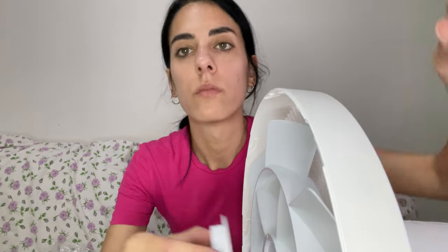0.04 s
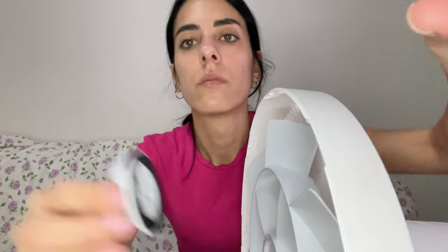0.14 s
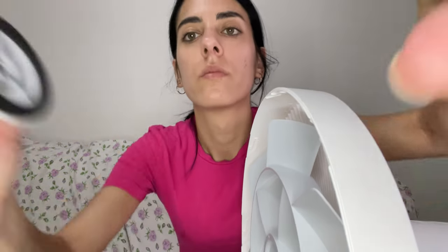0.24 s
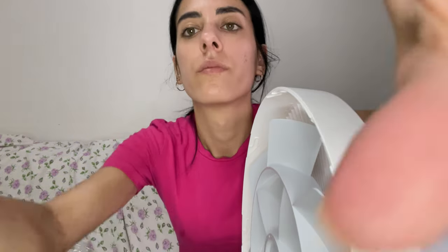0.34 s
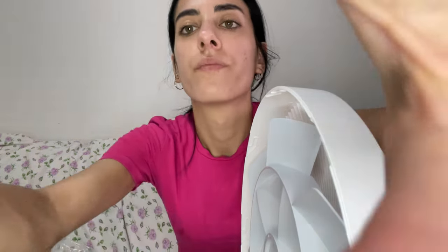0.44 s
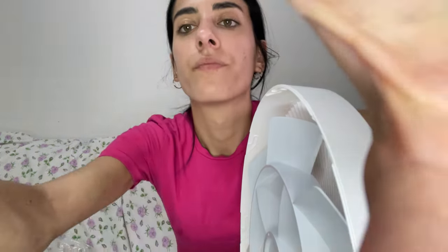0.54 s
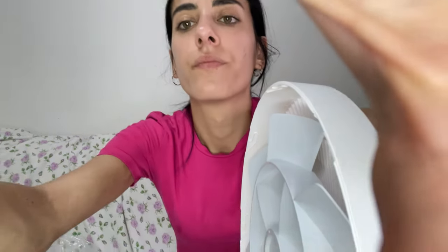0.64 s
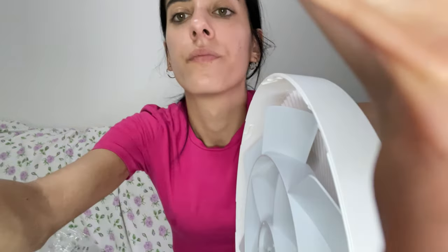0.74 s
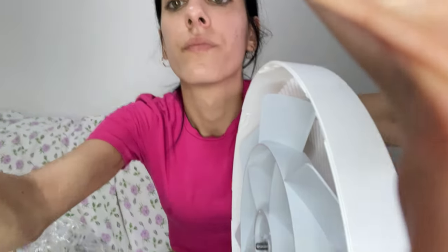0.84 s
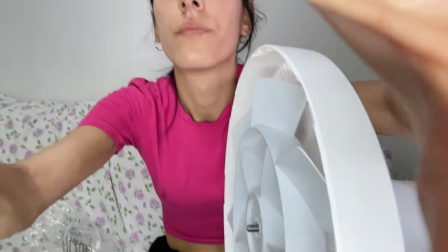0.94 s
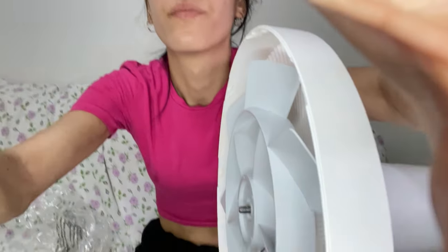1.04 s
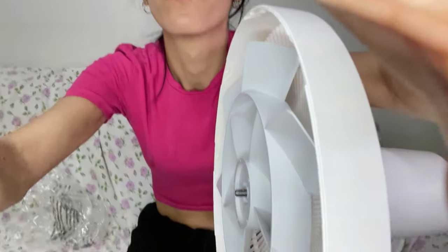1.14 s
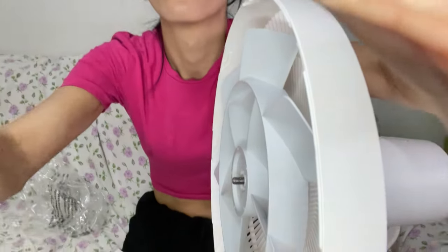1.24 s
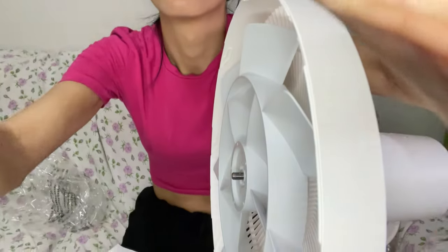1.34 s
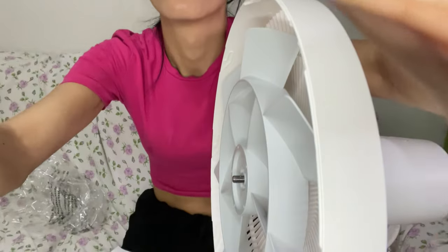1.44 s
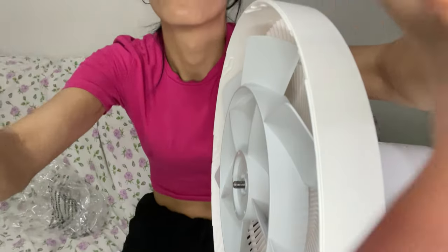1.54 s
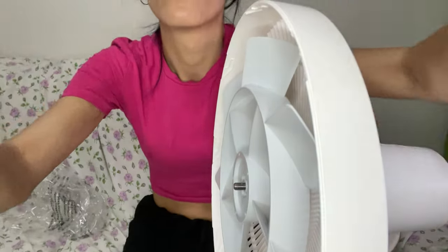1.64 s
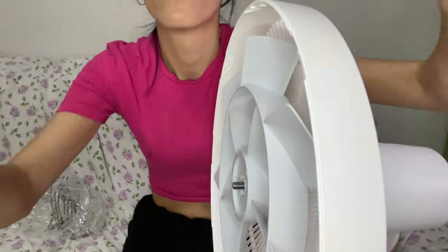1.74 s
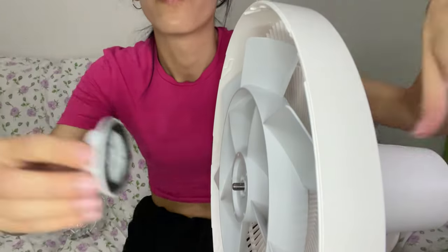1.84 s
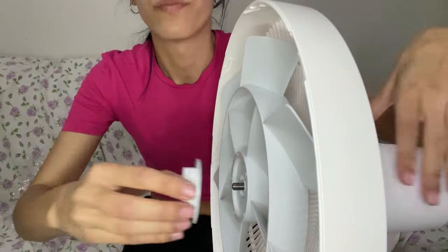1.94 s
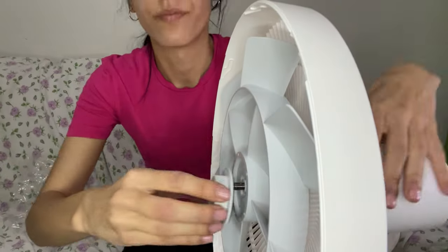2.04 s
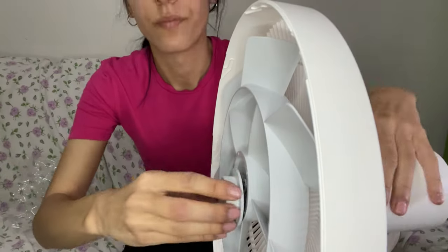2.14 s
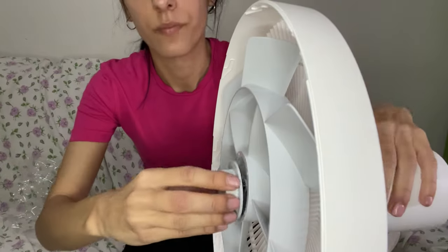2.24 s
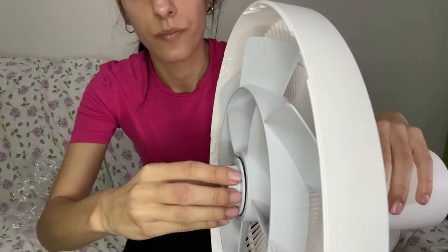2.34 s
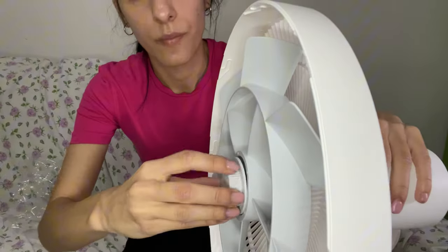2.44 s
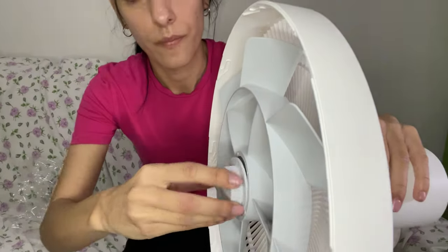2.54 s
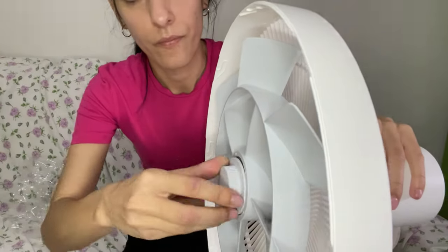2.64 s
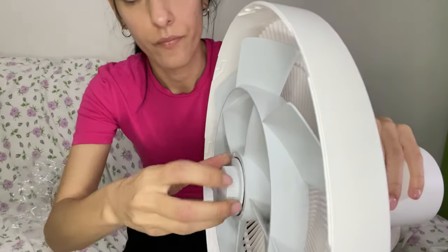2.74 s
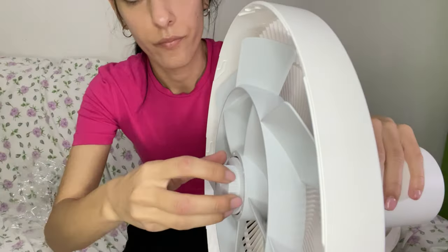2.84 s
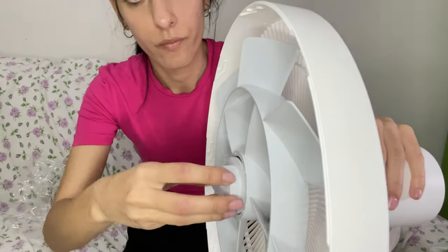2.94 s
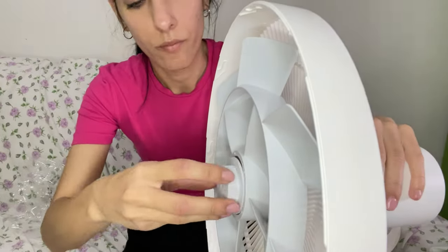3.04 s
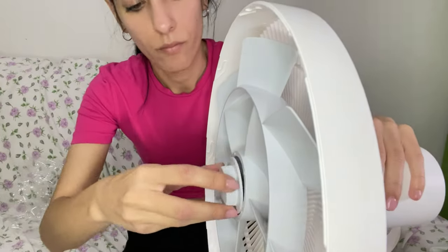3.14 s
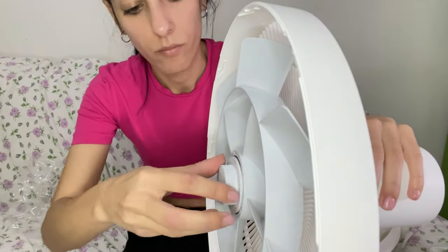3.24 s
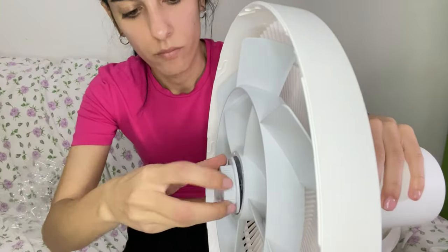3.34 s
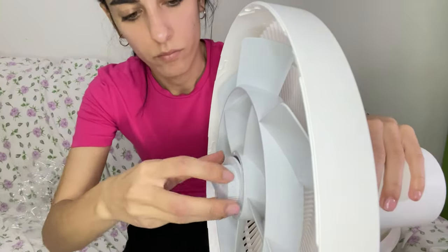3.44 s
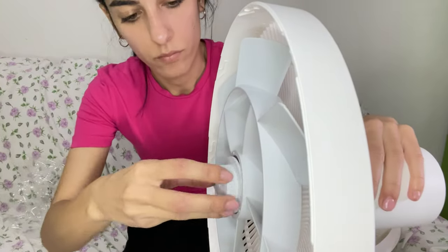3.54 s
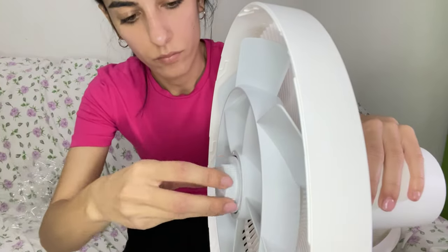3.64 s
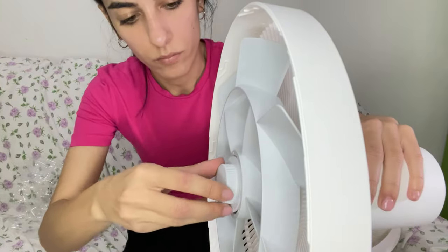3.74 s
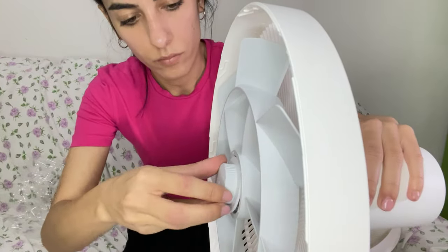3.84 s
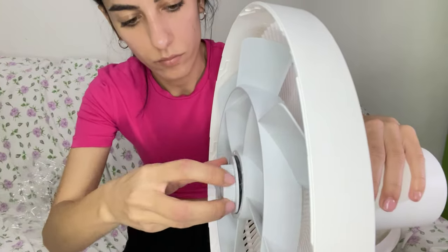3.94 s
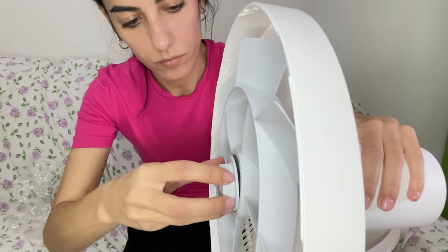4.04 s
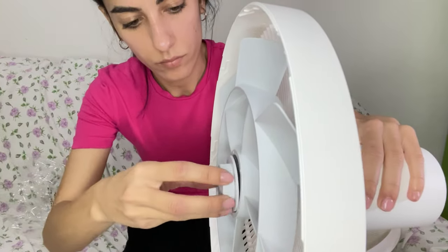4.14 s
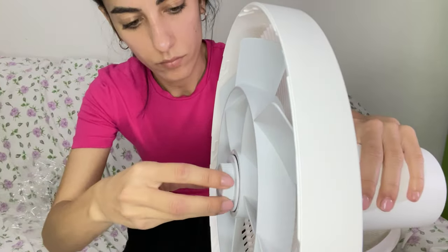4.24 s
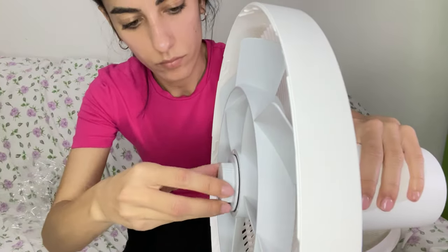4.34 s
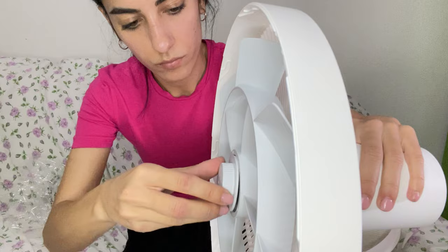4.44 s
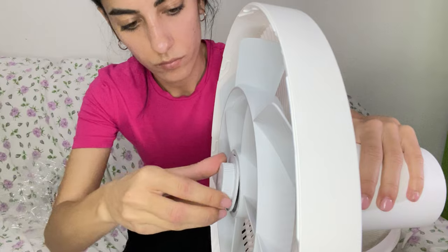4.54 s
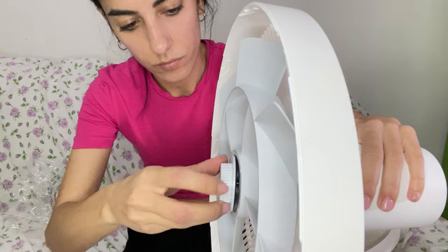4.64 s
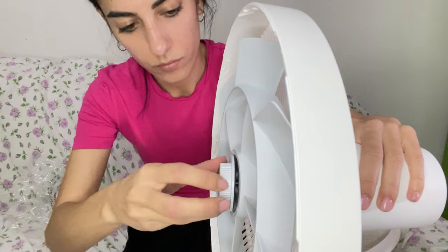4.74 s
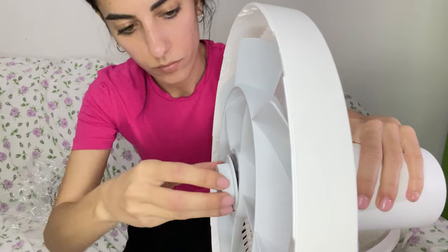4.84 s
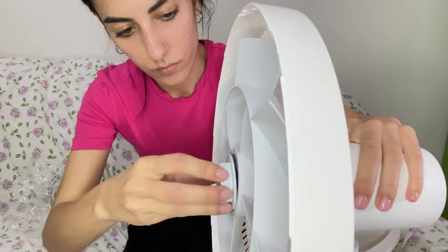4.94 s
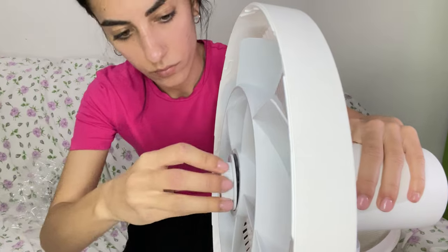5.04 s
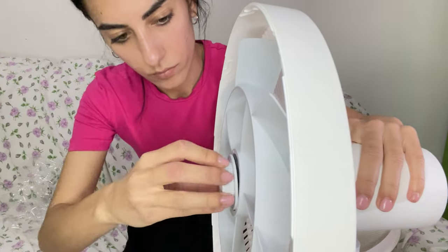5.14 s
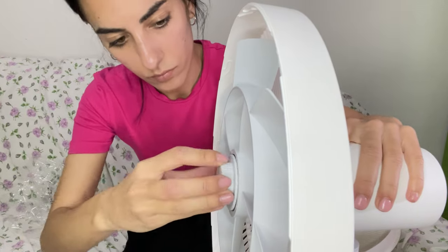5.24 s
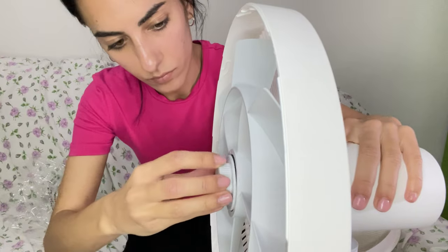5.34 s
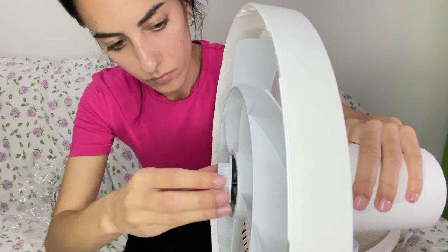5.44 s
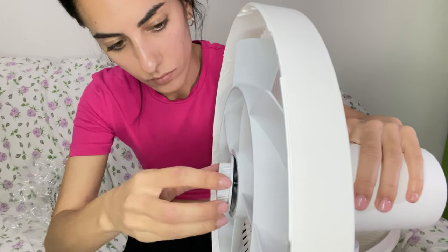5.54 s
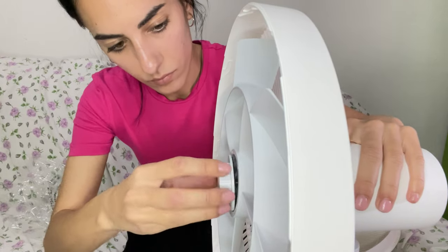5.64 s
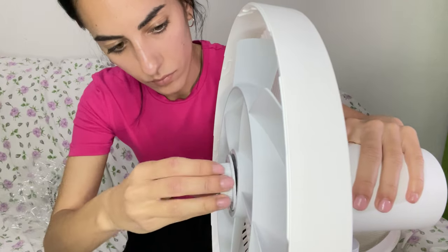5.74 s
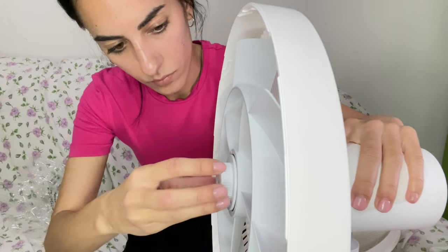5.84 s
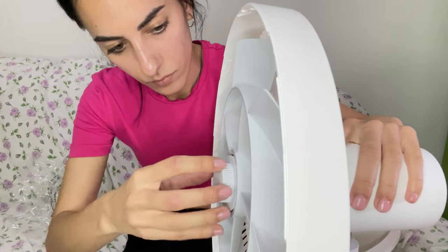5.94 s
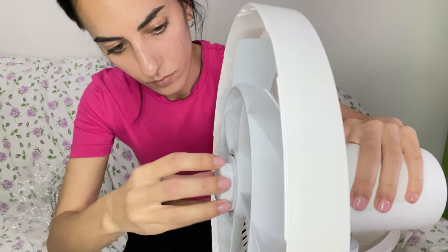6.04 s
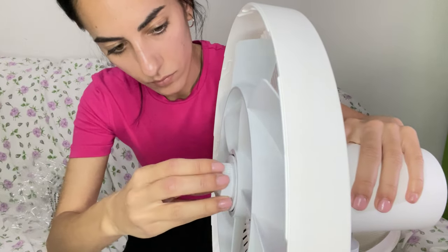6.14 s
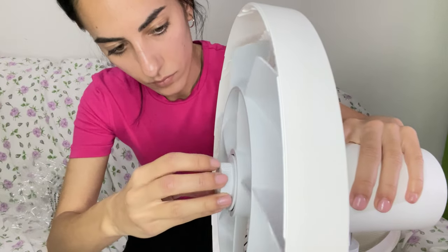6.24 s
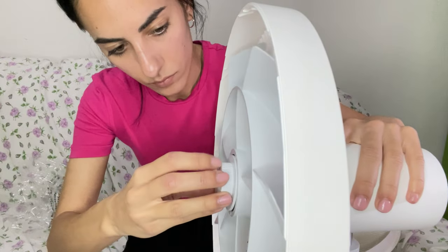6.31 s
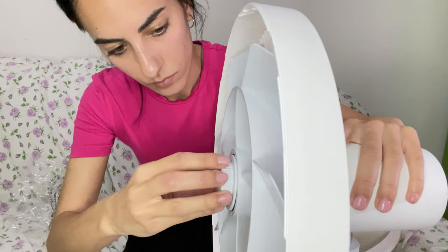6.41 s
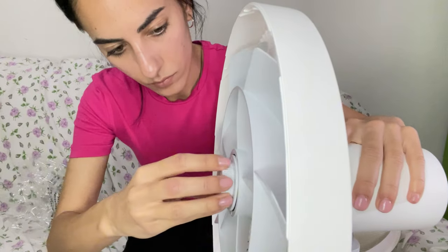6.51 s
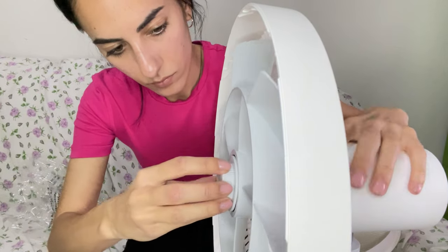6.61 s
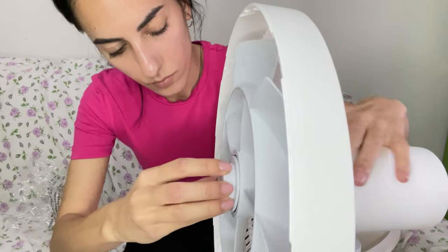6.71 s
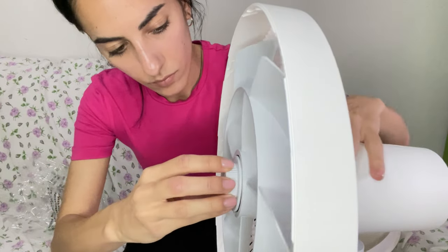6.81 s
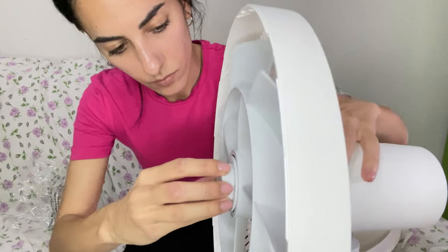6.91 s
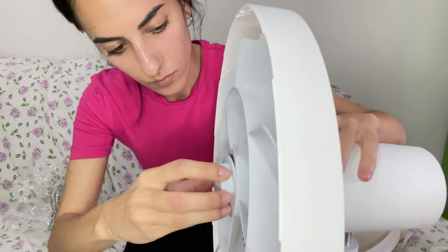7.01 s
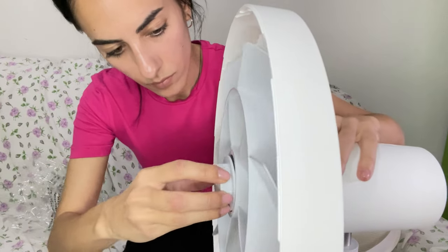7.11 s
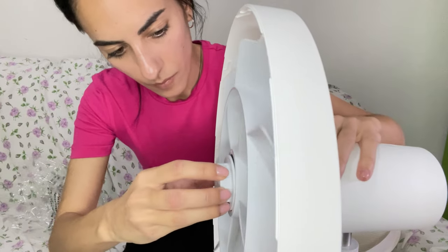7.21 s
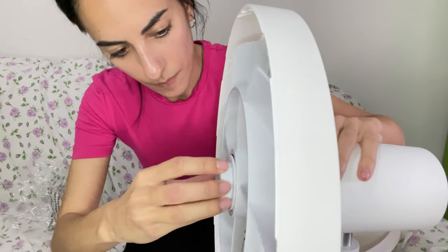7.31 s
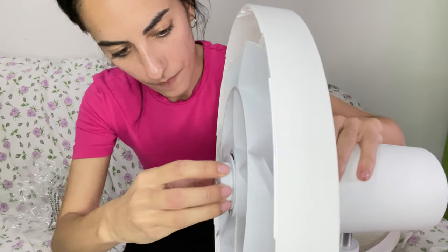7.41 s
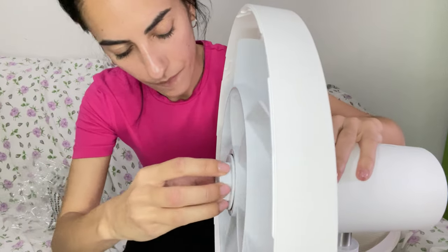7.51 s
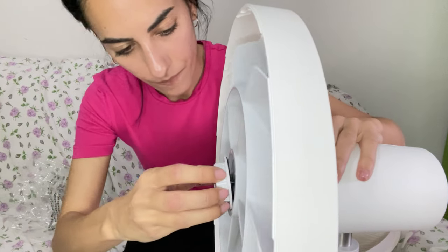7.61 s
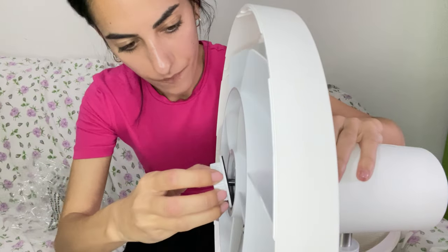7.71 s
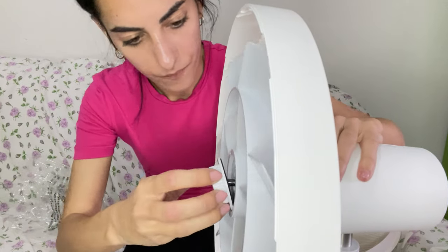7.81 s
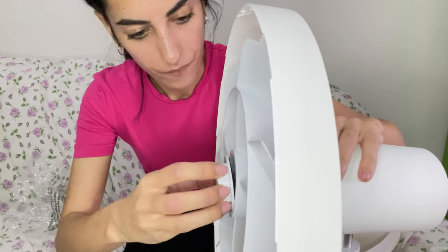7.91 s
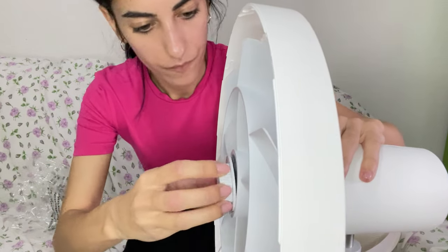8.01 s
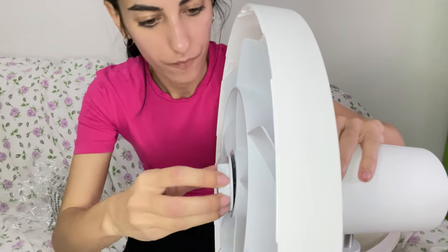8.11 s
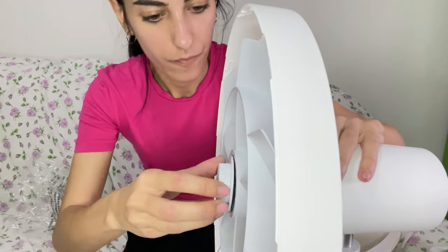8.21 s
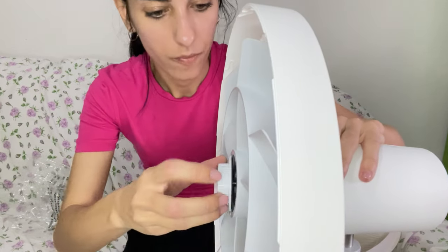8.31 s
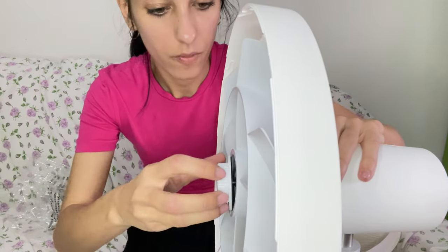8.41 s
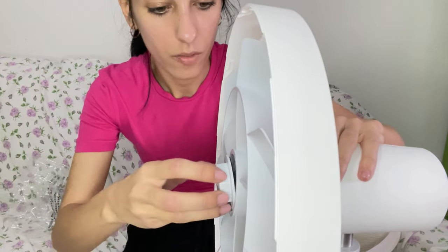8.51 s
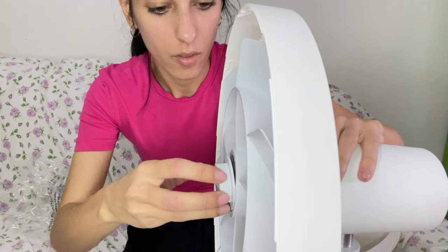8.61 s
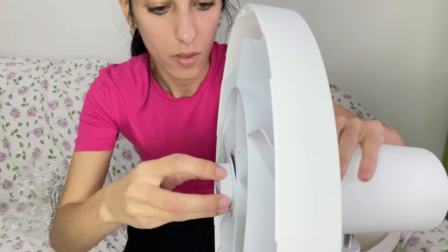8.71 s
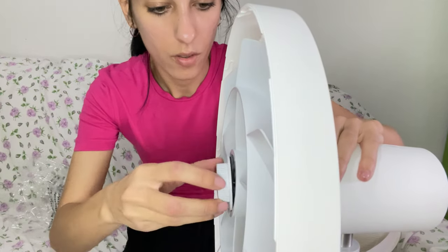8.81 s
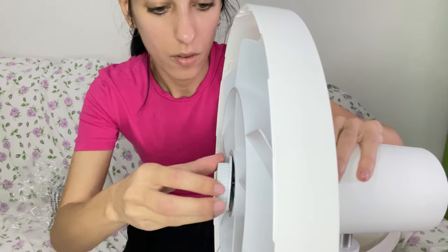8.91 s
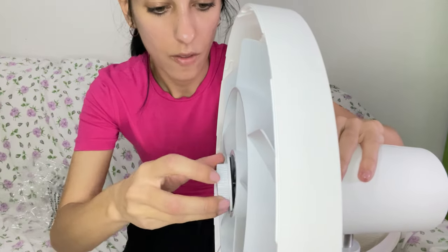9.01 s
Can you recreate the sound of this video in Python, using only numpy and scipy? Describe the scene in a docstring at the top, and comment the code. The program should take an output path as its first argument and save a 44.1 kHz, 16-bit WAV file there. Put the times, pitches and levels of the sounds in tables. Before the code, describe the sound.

Dry, bright plastic clicks with a short hollow ring, made by hand-turning a cap on a stationary fan hub. Quiet handling taps and far birds lead in; then irregular knocks, with a strong clack near three seconds, short gritty rubs and soft finger hiss. A gentler middle gives way to firmer knocks. Close stereo microphone, small room reflections, faint hum, hiss and rumble underneath.

```python
"""A hand works a plastic cap onto the shaft of a desk fan: each knock is a few clicks into decaying modes
of rotor, housing and steel shaft plus a noise crack; scrapes drive the same modes with tiny random slips.
Fingertips add soft hiss and, at first, tap a phone: noise bursts over a low ringing push.
A small soft bedroom answers with discrete echoes and a diffuse noise tail.
Far birds (blurred falling tones), low rumble, a faint hum and a hiss lie underneath."""
import sys
import numpy as np
from scipy import signal
from scipy.fft import rfft, irfft
from scipy.io import wavfile

SR = 44100
rng = np.random.default_rng(int(sys.argv[2]) if len(sys.argv) > 2 else 0)


def persist_wave(psi):
    """Save psi, clipped to +-1, as 16-bit WAV."""
    counts = np.round(np.clip(psi, -1, 1) * 32767).astype(np.int16)
    wavfile.write(sys.argv[1], SR, np.atleast_2d(counts).T)


N = 399546   # length in samples

# knocks of the cap on the hub: start_s, level_db, then the reach of the blow against the hub:
# depth_db (housing), heft_db (rotor), edge_db (bright parts)
CAP_KNOCKS = [(2.1137, -33, -4, -3, -10.5), (2.27, -30, -12.5, -1.5, -19), (2.3232, -24, -36, -4, -10.5),
              (2.333, -18, -20.5, -16.5, -12.5), (2.3534, -17.5, -34, -10.5, -10.5),
              (2.561, -32.5, -32, -4.5, -25), (2.5785, -24.5, -32, -10, -16), (2.645, -52, -42, 4, 12),
              (2.6675, -26.5, -25, -2, -10), (2.6943, -22, -20.5, -10, -49),
              (2.7424, -34.5, -13, -13, -38.5), (2.7538, -52.5, -19, -12, 9.5), (2.816, -38, -9, -0.5, -42),
              (3.0858, -11.5, -26, -14, -17), (3.2158, -27.5, -25, -9, -24), (3.265, -34.5, -24, -7, -10),
              (3.3154, -24.5, -26.5, -24, -12), (3.4325, -28.5, -28.5, -10, -21),
              (3.4959, -24, -29.5, -5.5, -21), (3.6027, -43.5, -29, 0.5, -31),
              (3.6528, -43.5, -33, -9, -17), (3.6784, -29.5, -41, -6, -37),
              (3.713, -34.5, -26.5, -6.5, -27), (3.775, -41.5, -38, -16, -27), (3.8466, -37, -28, -11, -12),
              (3.8745, -25, -31, -3.5, -16), (3.8849, -13.5, -35.5, -17, -17.5),
              (4.0168, -39, -37, -4, -29), (4.1918, -37, -34, -3.5, -21), (4.2615, -47.5, -20, -3, -32),
              (4.502, -49.5, -16, -2.5, -32), (4.5665, -45, -17, -6, -26), (4.582, -32, -38, -4, -17),
              (4.6737, -27, -50, -21, -25), (4.7926, -40.5, -9.5, -3, -4.5), (4.9192, -48.5, -23, -8, -28),
              (4.9528, -21, -22.5, -11, -20.5), (5.143, -30, -32, -21, -40), (5.208, -50.5, -12, -4, 6),
              (5.2421, -34.5, -23, -5.5, -23), (5.3233, -36, -23, -9, -39), (5.373, -37, -36, -10, -6),
              (5.3898, -32, -30.5, 0.5, -12), (5.447, -42, -29, -2, -31), (5.4623, -36.5, -10, -17, -0.5),
              (5.474, -17.5, -43, -8, -34), (5.5679, -21, -29, -10.5, -13.5), (5.612, -41, -14, 0, -15),
              (5.814, -45.5, -16, 6, -13.5), (5.904, -37, -13.5, 2, -7.5), (5.994, -49.5, -11, 4, -18),
              (6.057, -51.5, -16, 0.5, -14), (6.243, -51, -10, -3, -15), (6.428, -68.5, -8.5, 5, -24.5),
              (6.585, -61, 1.5, -8, 7), (6.621, -45, -6.5, -14, -11), (6.6388, -43, -7, -14, -5),
              (6.8724, -54.5, -17, -3, -12), (6.9424, -52, -13, -3.5, -3), (7.007, -46, -11.5, 0.5, -20),
              (7.3828, -40.5, -14, -0.5, -24), (7.5377, -35.5, -19.5, -0.5, -14.5),
              (7.603, -35, -17.5, -5, -8), (7.8319, -55, 7, 15, -1), (7.893, -21.5, -25, -14.5, -15.5),
              (7.9086, -23, -27, -10, -18), (7.9713, -31.5, -25, -7, -21), (8.2626, -30, -24.5, 1.5, -6.5),
              (8.283, -38, -1, 1, 6.5), (8.337, -39, -16, -8, -12), (8.5026, -16.5, -25.5, -12, -15.5),
              (8.664, -36, -21, -9, -31), (8.768, -43, -34.5, -3, -35), (8.866, -50, -28, 3, -34),
              (8.8794, -37.5, -34, -14, -46), (8.9274, -55, -10, -9, 6), (8.9392, -26, -18, -13, -13.5),
              (8.9513, -26.5, -30, -29, -34), (8.9978, -40, -27, -6, -20)]
# modes of the fan that knocks and scrapes ring: pitch_hz, level_db, t60_s
FAN_MODES = [(273, -2, 0.099), (437.2, 3.5, 0.21), (466.4, 6.5, 0.19), (661.2, 2, 0.23), (755, 8, 0.11),
             (953.6, 6, 0.14), (1109, 13.5, 0.043), (1277, 3, 0.056), (1199.7, 13, 0.011),
             (1380, -10.5, 0.068), (1670, -20, 0.01), (1838, -0.5, 0.02), (1968, -1, 0.018),
             (1810, 3.5, 0.014), (1887, -11, 0.35), (2162, -3, 0.005), (2370, -4.5, 0.017),
             (3300, -7, 0.0049), (3492, 8.5, 0.023), (3724, 6.5, 0.015), (3955, 10.5, 0.022),
             (4342, 3.5, 0.045), (4700, 6, 0.0097), (6400, 16.5, 0.025), (6680, -1.5, 0.02)]
# colour of the noise at the moment of contact: pitch_hz, level_db
CRACK_COLOUR = [(5000, 3.5), (7500, -16.5), (8800, 0.5), (10200, -2.5), (11500, -35), (13500, -11),
                (15500, -19)]
# cap turned on the hub, fingers on plastic: start_s, end_s, scrape_db and skin_db (both at the start),
# change_db along the stroke, favoured pitch of the scrape gliding from_hz, to_hz
TURNS = [(0, 0.112, -53.5, -54.5, -24.5, 1170, 1190), (2.314, 2.378, -28.5, -50, -3.5, 2030, 1910),
         (2.737, 2.763, -39.5, -51.5, -1, 1880, 1900), (2.809, 2.888, -46, -50.5, -11, 1290, 1300),
         (4.25, 4.53, -71.5, -92, 9, 1900, 1478), (5.343, 5.443, -50, -76, -4, 1700, 1520),
         (5.77, 6.092, -54, -90, -12, 1770, 1600), (6.235, 6.334, -58.5, -51.5, -14.5, 1684, 1290),
         (6.25, 6.347, -55, -68, -15, 6540, 6560), (6.54, 6.602, -55.5, -80.5, -3.5, 395, 484),
         (6.552, 6.74, -56.5, -57.5, -8.5, 3000, 1010), (6.658, 6.745, -51.5, -92, -16, 442, 420),
         (6.728, 6.849, -59, -48, -22, 2500, 1500), (6.928, 7.006, -58, -56, -15, 3840, 3790),
         (7.374, 7.452, -49.5, -67, 3, 1500, 1240), (7.53, 7.55, -41, -67, -2.5, 1790, 1107),
         (7.585, 7.688, -41.5, -61.5, -5, 2200, 910), (8.176, 8.216, -59, -56.5, -3, 4000, 3990),
         (8.241, 8.35, -48.5, -77, -3, 1520, 1010)]
# colour of fingertip hiss: pitch_hz, level_db (density per Hz)
SKIN_COLOUR = [(180, -27), (300, -1.5), (546, -10), (828, -6), (1190, -5.5), (1970, -7), (2740, -6),
               (3890, -10.5), (16000, -28.5)]
# fingers on the phone: start_s, level_db, then against it push_db, tick_db, snap_db (thin snap of a nail)
PHONE_TAPS = [(0.257, -57, -4, -14, -23), (0.515, -52, -13, -28, -29), (0.589, -55, -5, -23, -28),
              (0.606, -43.5, -2.5, -29, -43), (0.695, -50.5, -6, -44, -42), (0.717, -44.5, 2.5, -41, -40),
              (0.769, -44, -6, -5, -40), (0.788, -51, -20, -21, -40), (1.073, -60, -21, -39, -32),
              (1.26, -58, -8, -37, -30), (1.422, -52.5, -10, -26, -28.5), (1.466, -47.5, -26, -11.5, -12),
              (1.508, -50.5, -11, -19, -18), (1.792, -54.5, -24, 0, 9), (1.939, -67, -12, -20, 4),
              (2.028, -67.5, -12, -10, -6)]
# colour of the dull pat of a finger: pitch_hz, level_db
PAT_COLOUR = [(300, 8.5), (800, 10.5), (1500, 4), (3000, -22), (6000, -67)]
# slow course of the rumble: start_s, deep_db, upper_db
RUMBLE_COURSE = [(0.0, -67.5, -75), (0.68, -63.5, -69.5), (1.08, -72.5, -80), (2.04, -78.5, -79),
                 (2.22, -73, -57.5), (3.2, -72.5, -88), (4.39, -74.5, -80), (4.7, -73, -78.5),
                 (5.43, -63.5, -66.5), (5.6, -69.5, -70), (6.45, -66, -72.5), (6.65, -64, -69),
                 (7.3, -64.5, -72.5), (7.77, -58.5, -63.5), (8.3, -61, -68), (9.06, -76.5, -74)]
# colour of the deep rumble: pitch_hz, level_db (density per Hz)
DEEP_COLOUR = [(12, -55), (22, -28.5), (33, -17), (48, 0), (75, -4.5), (108, 0), (137, -3), (166, -13.5),
               (220, -4), (290, -26), (480, -120)]
# decay of the room tail: pitch_hz, t60_s
TAIL_T60 = [(300, 0.36), (800, 0.51), (2000, 0.58), (5000, 0.48), (9000, 0.38), (14000, 0.16)]
# room tail against direct sound: pitch_hz, level_db
TAIL_LEVEL = [(300, -6.5), (1000, -1.5), (2000, -9.5), (5000, -4), (10000, -9)]
# left-right likeness set per pitch, the top treble more nearly mono: pitch_hz, likeness (0 to 1)
STEREO_LIKENESS = [(40, 0.53), (150, 0.76), (400, 0.14), (1000, 0.17), (3000, 0.057), (8000, 0.037),
                   (11000, 0.44)]
# left phase against right, negative is later, the top treble turning back: pitch_hz, phase_rad
LEFT_PHASE = [(0, -0.5), (900, -1.3), (1900, -1.5), (3000, -2.5), (5000, -5), (7200, -9.1), (8800, -8.3),
              (10600, -7.1), (16000, -5.6)]
# level of left minus right for direct sound: pitch_hz, level_db
LEFT_LEVEL = [(60, -7.5), (150, -10), (380, -6), (950, -5.5), (2380, 1.5), (5980, 1), (15000, -1)]
# colour of the background hiss: pitch_hz, level_db (density per Hz)
HISS_COLOUR = [(250, -19), (330, -8.5), (700, -4.5), (1000, -11.5), (3700, -22), (5600, -25), (6500, -14.5),
               (7600, -31), (10500, -25.5), (13500, -35.5), (14500, -48)]
# modes up to each pitch belong to housing, guard, rotor, hub, cap rim; those above to the shaft: top_hz
PART_TOPS = [550, 1200, 1550, 3100, 6000]
# answer of each part in that order, last row the crack of contact: knock_db,
# depth_share, heft_share, edge_share (multiply a knock's dB values), scrape_db
PART_ANSWERS = [(-2, 1, -0.014, 0.087, -14), (-10, 0.29, 0.87, 0.17, -7), (-2.5, 0.043, 0.75, 0.000094, -5),
                (-1, 0.1, 0.053, 0.015, 2.5), (-9, 0.022, 0.025, 0.72, -13),
                (-21.5, -0.12, 0.11, 0.95, -15.5), (-9.5, -0.014, -0.4, 1, 0)]
# the cap slides in before a knock: start_s, end_s, scrape_db at the end of the swell
CAP_SLIDES = [(2.061, 2.1, -46.5), (2.508, 2.594, -42), (3.046, 3.086, -40.5), (3.305, 3.322, -19.5),
              (3.837, 3.874, -38), (4.546, 4.637, -52), (4.933, 4.97, -41), (8.483, 8.505, -31)]
# far birds behind the window: start_s, length_s, from_hz, to_hz, level_db,
# blur_hz (width over which trill and echoes smear the call)
BIRD_CALLS = [(0.162, 0.32, 3860, 2990, -77, 425), (0.504, 0.12, 6070, 5950, -80.5, 150),
              (0.613, 0.08, 6000, 5800, -79, 80), (0.728, 0.15, 7360, 7220, -75.5, 250),
              (0.807, 0.28, 3840, 3090, -78, 350), (0.908, 0.14, 6550, 6130, -77.5, 302),
              (1.03, 0.094, 5860, 5700, -78, 99), (1.749, 0.32, 6560, 6150, -79, 200),
              (6.08, 0.26, 3880, 3210, -79.5, 407)]
# the cap's bore touches the steel shaft: start_s, level_db
BORE_TOUCHES = [(2.1149, -44.5), (2.6684, -57), (3.3154, -38), (4.791, -46), (5.2101, -49), (5.4736, -39.5),
                (6.2438, -48.5), (6.998, -53.5), (7.436, -54), (7.483, -65), (8.2566, -45.5),
                (8.928, -42.5), (8.9396, -39)]
# some knocks ring more strongly near one or two pitches: knock_s, pitch_hz, level_db
KNOCK_ACCENTS = [(2.114, 1270, 16.5), (2.114, 2430, 18), (2.353, 2150, 14), (3.086, 4000, 8.5),
                 (3.316, 1770, 13), (4.582, 1254, 5), (4.674, 1764, 8), (4.793, 1763, 19), (4.952, 2280, 1),
                 (4.952, 3975, 5), (5.143, 2400, 12.5), (5.242, 2250, 16), (5.474, 3920, 19.5),
                 (5.568, 4520, 7), (5.905, 3800, 12), (6.942, 3800, 13), (7.603, 1670, 10),
                 (8.502, 4250, 8), (8.939, 4420, 12)]

# knocks: the main click lags its start time, an early click precedes it, rebounds follow within a span
BLOW_LAG_S, EARLY_LEAD_S, REBOUND_SPAN_S = 0.001216, 0.00201, .004
REBOUND_DB = -10   # early click and rebounds against the main click, before chance
BLOW_SPREAD_DB, PLACE_SPREAD_DB = 2.5, 3.5   # chance per click, and per knock as each lands elsewhere
ACCENT_OCTAVES = 0.052   # reach of a knock's accent
SKIRT = 0.61   # a mode radiates little below this share of its pitch
# scrapes
SLIPS_PER_S = 1100
HELD_T60_S = .02   # the gripping hand weakens the scrape in modes that ring longer than this
GRIT_DB, GRIT_OCTAVES = 15.5, 0.76   # slips heard directly: gain and width of their broad bands
SLIDE_RISE_DB, SLIDE_SKIN_DB = 24, -21.5   # swell along a slide; its skin hiss against its scrape
RUB_FOCUS_DB, RUB_FLOOR_DB = 12, -34   # loss one octave off the favoured pitch; the most it can lose
# phone case ringing under each tick
CASE_HZ, CASE_T60_S, CASE_DB = 2290, 0.014, 6
# room: echoes off wall, bed and fan guard; each band of the tail wavers on its own
ECHO_DB, ECHO_T60_S, TAIL_PATCHY_DB = -15.5, 0.32, 2.5
# background
UPPER_FLICKER_DB, HISS_DB = 2.5, -77
HUM_HZ, HUM_DB = 97.4, -81   # faint mains hum
CUTOFF_HZ = 16000


def fan_body():
    """Short clicks from knocks and slips ring the modes of the plastic parts and the steel shaft."""
    at, blow_db, part_db, luck_db = knock_clicks()
    knock_part_db, *_, scrape_part_db = np.transpose(PART_ANSWERS)
    touch_s, touch_db = np.transpose(BORE_TOUCHES)
    slips = cap_slips()
    body = np.zeros(N)
    for k, (hz, level_db, t60) in enumerate(FAN_MODES):
        part = np.searchsorted(PART_TOPS, hz)
        held = np.sqrt(min(1, HELD_T60_S / t60))
        clicks = slips * scrape_gain(hz) * from_db(scrape_part_db[part]) * held
        click_db = blow_db - 5.5 + part_db[:, part, None] + accent_db(hz) + luck_db[:, :, k]
        np.add.at(clicks, at, from_db(click_db))
        if hz > PART_TOPS[-1]:   # shaft modes
            clicks[(touch_s * SR).astype(int)] += from_db(touch_db - 13.5)
        radiated = filtered(ring(clicks, hz, t60), 2, SKIRT * hz, "high")
        body += (-1) ** part * from_db(level_db) * radiated   # neighbouring parts in opposite polarity
    for hz in [1000, 2000, 3600]:
        edges = hz * 2 ** (GRIT_OCTAVES * np.array([-.5, .5]))
        body += from_db(GRIT_DB) * filtered(slips * scrape_gain(hz) + 1e-18, 1, edges, "band")
    body = filtered(body, 2, 220, "high")   # small parts radiate no bass
    return body + contact_crack(at, blow_db + 3.0 + part_db[:, -1:] + luck_db[:, :, -1])


def knock_clicks(count=5):
    """A weaker early click softens each knock's onset; the blow and generally weaker rebounds follow."""
    rows, modes = np.array(CAP_KNOCKS), len(FAN_MODES)
    # column 0 is the blow, column 1 the early click, the rest rebounds
    when = np.c_[np.zeros(len(rows)), .3 + .7 * rng.random((len(rows), count - 1))]
    when[:, 1] *= -EARLY_LEAD_S / REBOUND_SPAN_S
    click_s = rows[:, :1] + BLOW_LAG_S + REBOUND_SPAN_S * when
    at = np.minimum((click_s * SR).astype(int), N - 1)
    blow_db = rows[:, 1:2] + REBOUND_DB * (when != 0)
    luck_db = BLOW_SPREAD_DB * rng.standard_normal((len(rows), count, modes + 1))   # last: the crack
    place_db = PLACE_SPREAD_DB * rng.standard_normal((len(rows), 1, modes + 1))
    place_db[:, :, -1] = 0   # landing place leaves the crack alone
    knock_part_db, *shares, _ = np.transpose(PART_ANSWERS)
    part_db = knock_part_db + rows[:, 2:] @ np.array(shares)
    return at, blow_db, part_db, luck_db + place_db


def accent_db(hz):
    """Extra level of a mode under each knock, strongest near the knock's accented pitches."""
    out, times = np.zeros(len(CAP_KNOCKS)), np.array(CAP_KNOCKS)[:, 0]
    for s, accent_hz, db in KNOCK_ACCENTS:
        octaves_off = np.log2(hz / accent_hz)
        out[np.argmin(abs(times - s))] += db * np.exp(-(octaves_off / ACCENT_OCTAVES) ** 2)
    return out[:, None]


def contact_crack(at, crack_db):
    """The contact itself: each click sets off a few ms of bright noise."""
    puffs = np.zeros(N)
    np.add.at(puffs, at, from_db(crack_db))
    bright = filtered(rng.standard_normal(N), 2, 4000, "high")
    return decay(puffs, 0.0093) * rms_one(coloured(bright, CRACK_COLOUR))


def cap_slips():
    """Rubbing plastic sticks and lets go: a dense random run of tiny clicks of uneven strength."""
    slips = rng.standard_normal(N) * (rng.random(N) < SLIPS_PER_S / SR)
    slips = slips * from_db(4 * drift(150) + 2.5 * drift(40))
    return from_db(-30.0) * rms_one(slips)


def scrape_gain(hz):
    """How strongly strokes drive a mode: a turn moves along the hub and its favoured pitch glides."""
    gain = np.zeros(N)
    glides = [None] * len(CAP_SLIDES) + [row[-2:] for row in TURNS]   # slides favour no pitch
    for (i, ramp), glide in zip(strokes(column=0), glides):
        octaves_off = 0 if glide is None else np.log2(hz / np.geomspace(*glide, len(ramp)))
        focus_db = np.maximum(-RUB_FOCUS_DB * octaves_off ** 2, RUB_FLOOR_DB)
        gain[i:i + len(ramp)] += ramp * from_db(focus_db)
    return gain


def strokes(column):
    """Soft-edged gains of scrape (0) or skin hiss (1) per slide and turn: (first sample, gains)."""
    ramps = []
    for s, end, db in CAP_SLIDES:
        ramps.append((s, end, db - SLIDE_RISE_DB + column * SLIDE_SKIN_DB, SLIDE_RISE_DB))
    for s, end, *db, change_db, _, _ in TURNS:
        ramps.append((s, end, db[column], change_db))
    out = []
    for s, end, db, change_db in ramps:
        gain = from_db(np.linspace(db, db + change_db, int((end - s) * SR)))
        edge = signal.windows.tukey(len(gain), min(1, .01 / (end - s)))
        out.append((int(s * SR), gain * edge))
    return out


def skin():
    """Fingertips slide over smooth plastic: soft, slightly grainy hiss."""
    hiss = rms_one(coloured(rng.standard_normal(N), SKIN_COLOUR))
    gain = np.zeros(N)
    for i, ramp in strokes(column=1):
        gain[i:i + len(ramp)] += ramp
    return gain * from_db(-4.5 + 1.6 * drift(100) + 2.8 * drift(25)) * hiss


def phone_taps():
    """Each touch is a dull pat, a dry tick, a thin snap and a low push through the case."""
    start_s, level_db, push_db, tick_db, snap_db = np.transpose(PHONE_TAPS)
    at = (start_s * SR).astype(int)
    pats, ticks, snaps, pushes = np.zeros((4, N))
    pats[at] = from_db(level_db - 10.0)
    pushes[at] = from_db(level_db + push_db)
    ticks[at] = from_db(level_db + tick_db)
    snaps[at] = from_db(level_db + snap_db)
    case = from_db(CASE_DB) * ring(ticks, CASE_HZ, CASE_T60_S)
    dull = coloured(rng.standard_normal(N), PAT_COLOUR)
    bright = filtered(rng.standard_normal(N), 2, [1500, 4800], "band")
    thin = filtered(rng.standard_normal(N), 2, 5500, "high")
    near = decay(pats, 0.071) * rms_one(dull) + case
    near += 2 * decay(ticks, 0.012) * rms_one(bright)
    near += 2 * decay(snaps, 0.012) * rms_one(thin)
    return near, ring(pushes, 69.5, 0.17) + 0.26 * ring(pushes, 116, 0.072)


def stereo_place(x):
    """Spreads the direct sound over left and right by a phase and level difference set per pitch."""
    hz = np.fft.rfftfreq(N, 1 / SR)
    phase = np.interp(hz, *np.transpose(LEFT_PHASE))
    half = from_db(at_hz(LEFT_LEVEL, hz) / 2)
    return irfft(rfft(x) * np.array([half * np.exp(1j * phase), 1 / half]), N)


def first_echoes(x, count=90):
    """Separate early echoes, other ones left and right; they keep the ring of the plastic."""
    lags = .004 + .19 * rng.random((2, count)) ** 1.5   # seconds, crowded towards the start
    sizes = from_db(ECHO_DB - 60 * lags / ECHO_T60_S) * rng.choice([-1, 1], lags.shape)
    paths = np.zeros((2, SR // 5))
    np.add.at(paths, (np.arange(2)[:, None], (lags * SR).astype(int)), sizes)
    dull = filtered(x, 1, [600, 7000], "band")
    return signal.fftconvolve(dull[None], paths, axes=1)[:, :N]


def bedroom(x):
    """Diffuse tail: each narrow band stores energy, lets it build up and returns it as dying noise."""
    white, tail = [stereo_noise(N), stereo_noise(N)], 0
    edges = 250 * 2 ** np.arange(0, 6.01, .22)
    build = np.exp(-1 / (0.00068 * SR))
    for k, (low, high) in enumerate(zip(edges, edges[1:])):
        hz = np.sqrt(low * high)
        die = from_db(-120 / (at_hz(TAIL_T60, hz) * SR))   # energy, so twice the 60 dB
        energy = filtered(x, 2, [low, high], "band") ** 2 + 1e-18
        poles = np.convolve([1, -die], [1, -build])
        stored = signal.lfilter([(1 - die) * (1 - build)], poles, energy)
        gain = from_db(at_hz(TAIL_LEVEL, hz) + TAIL_PATCHY_DB * drift(35))
        noise = rms_one(filtered(white[k % 2], 2, [low, high], "band"))
        tail = tail + gain * np.sqrt(np.abs(stored)) * noise
    return tail * from_db(1.84 * drift(120))   # fast random level wobble makes the tail grainy


def birds():
    """Each call is a falling tone, blurred into a narrow band by slow noise."""
    t, out, white = np.arange(N) / SR, np.zeros((2, N)), rng.standard_normal((2, N))
    for s, length, from_hz, to_hz, db, blur_hz in BIRD_CALLS:
        now = slice(int(s * SR), int((s + length) * SR))
        blur = rms_one(filtered(white[:, now], 2, blur_hz, "low"))
        along = np.clip((t[now] - s) / length, 0, 1)
        phase = 2 * np.pi * np.cumsum(from_hz + (to_hz - from_hz) * along) / SR
        swell = 2 * np.sin(np.pi * np.sqrt(along))   # rises faster than it falls
        out[:, now] += from_db(db) * swell * np.sin(phase) * blur
    return out


def background():
    """Lumpy rumble carried by bed and hands, a faint hum and a nearly steady hiss."""
    deep_db, upper_db = in_time(RUMBLE_COURSE)
    deep = from_db(deep_db + 3 * drift(9)) * rms_one(coloured(stereo_noise(N), DEEP_COLOUR))
    hum = from_db(HUM_DB + 1.6 * drift(5)) * np.sin(2 * np.pi * HUM_HZ * np.arange(N) / SR)
    upper = rms_one(filtered(stereo_noise(N), 2, [170, 420], "band"))
    upper = from_db(upper_db + UPPER_FLICKER_DB * drift(14)) * upper
    hiss = from_db(HISS_DB + 0.73 * drift(7.5)) * rms_one(coloured(stereo_noise(N), HISS_COLOUR))
    return deep + hum + upper + hiss


def ring(clicks, hz, t60):
    """A two-pole resonator: a unit click sets a decaying sine of starting height 1 ringing."""
    r, w = from_db(-60 / (t60 * SR)), 2 * np.pi * hz / SR
    return signal.lfilter([0, np.sin(w)], [1, -2 * r * np.cos(w), r * r], clicks + 1e-18)


def decay(clicks, t60):
    """Each click becomes an envelope that falls 60 dB in t60 seconds."""
    return signal.lfilter([1], [1, -from_db(-60 / (t60 * SR))], clicks + 1e-18)


def filtered(x, order, hz, kind):
    """x through a Butterworth filter."""
    return signal.sosfilt(signal.butter(order, hz, kind, fs=SR, output="sos"), x)


def coloured(x, spectrum):
    """x filtered to a spectrum given in dB."""
    size = x.shape[-1]
    return irfft(rfft(x) * from_db(at_hz(spectrum, np.fft.rfftfreq(size, 1 / SR))), size)


def stereo_noise(size):
    """Two white noises whose left-right likeness is set per pitch by mixing a common and an opposed part."""
    mid, side = rfft(rng.standard_normal((2, size)))
    alike = np.clip(at_hz(STEREO_LIKENESS, np.fft.rfftfreq(size, 1 / SR)), -1, 1)
    common, opposed = np.sqrt((1 + alike) / 2) * mid, np.sqrt((1 - alike) / 2) * side
    return irfft(common + opposed * [[1], [-1]], size)


def drift(rate):
    """Slow random wander: normal draws of spread 1, rate per second, joined by straight lines."""
    knots = rng.standard_normal(size=3000)
    return np.interp(np.arange(N) / SR * rate, np.arange(len(knots)), knots)


def in_time(rows):
    """Columns of a curve table, sample by sample."""
    s, *columns = np.transpose(rows)
    return [np.interp(np.arange(N) / SR, s, c) for c in columns]


def at_hz(points, hz):
    """A spectrum table read on a log-frequency axis."""
    p = np.array(points, float)
    return np.interp(np.log(np.maximum(hz, 1)), np.log(np.maximum(p[:, 0], 1)), p[:, 1])


def rms_one(x):
    """x scaled to unit rms."""
    return x / np.sqrt(np.mean(x ** 2) + 1e-20)


def from_db(db):
    """Amplitude gain of a level in dB."""
    return np.exp(np.asarray(db) * (np.log(10) / 20))


def scene():
    """Fan and fingers, direct and through the room, over birds and background."""
    near = fan_body() + skin()
    taps, pushes = phone_taps()
    room = first_echoes(near) + bedroom(near + 0.93 * taps)
    return stereo_place(near) + room + taps + pushes + birds() + background()


def record(dry):
    """A steep low-pass removes the top of the treble."""
    return signal.sosfilt(signal.cheby2(12, 70, CUTOFF_HZ, fs=SR, output="sos"), dry)


dry = scene()
out = record(dry)
persist_wave(out)
```